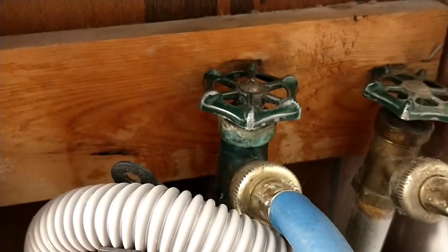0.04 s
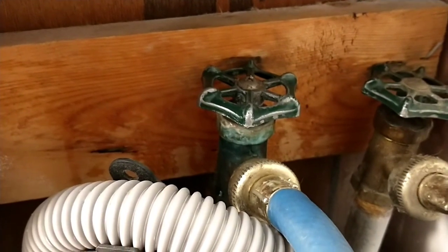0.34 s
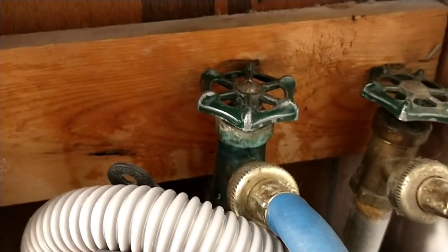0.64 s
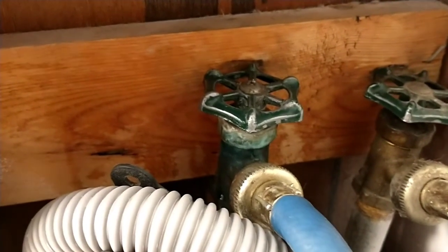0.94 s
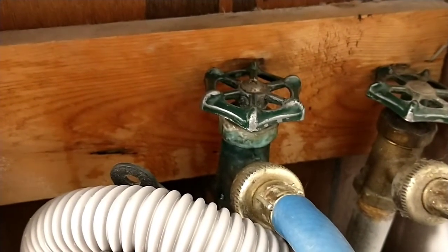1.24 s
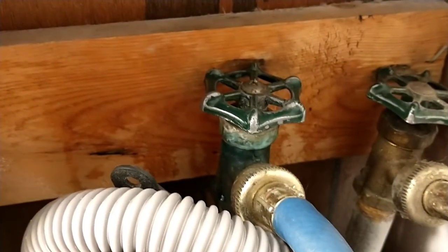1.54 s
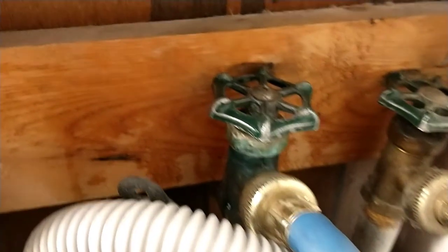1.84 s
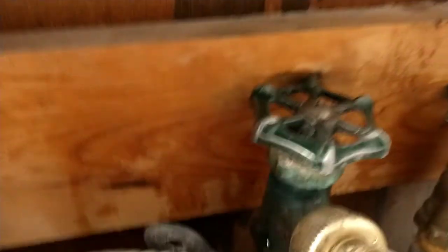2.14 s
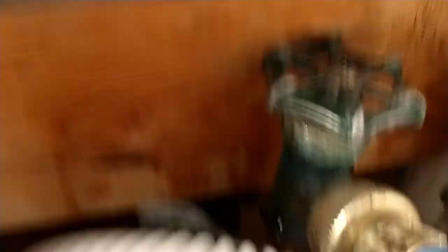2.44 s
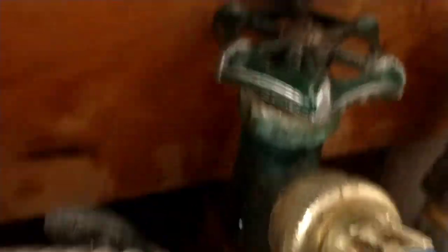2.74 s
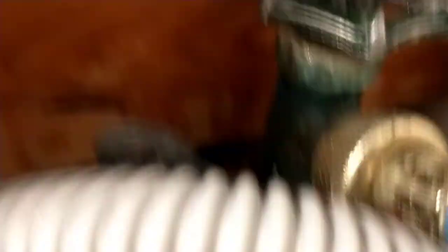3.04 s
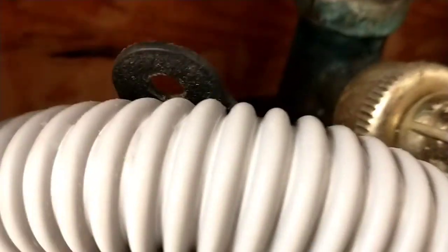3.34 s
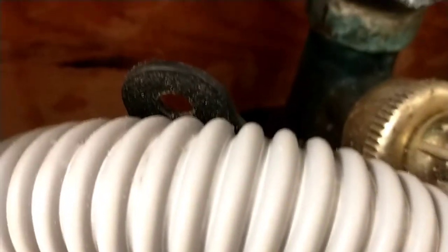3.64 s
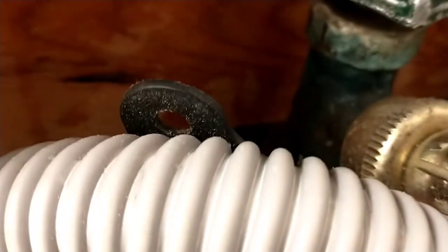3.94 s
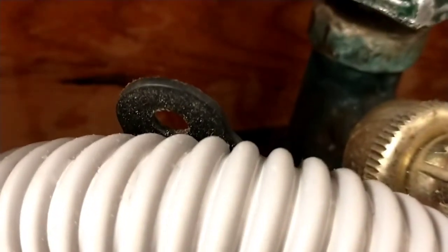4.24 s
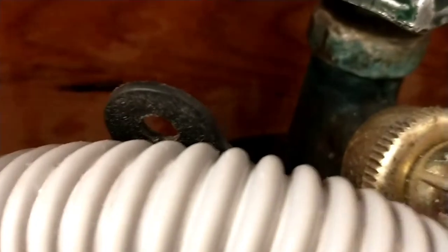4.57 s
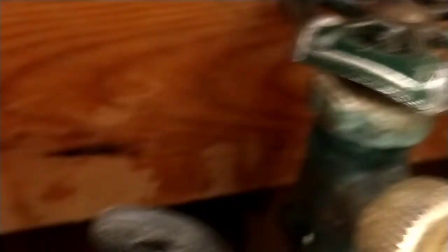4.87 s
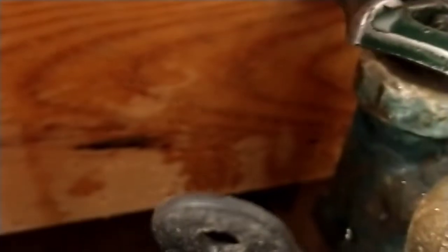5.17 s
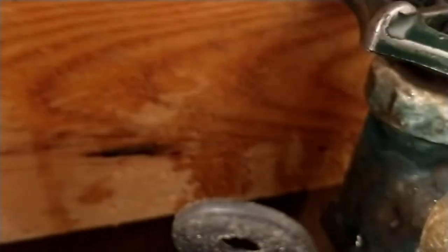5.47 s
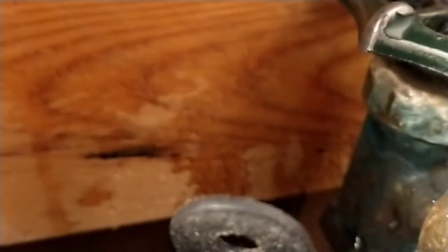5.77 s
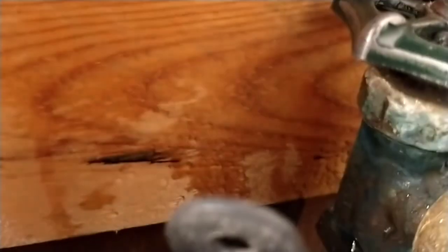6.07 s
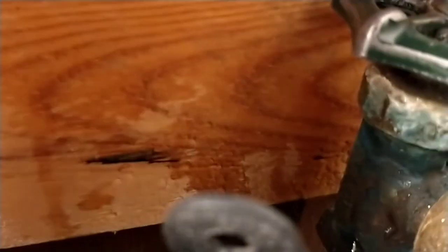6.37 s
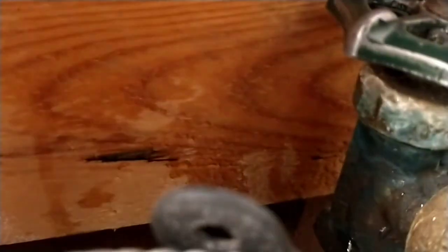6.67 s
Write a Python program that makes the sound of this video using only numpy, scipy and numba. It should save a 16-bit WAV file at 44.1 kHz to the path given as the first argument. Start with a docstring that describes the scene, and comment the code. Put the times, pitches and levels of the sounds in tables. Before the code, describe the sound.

A leaky valve coupling sputters indoors with a thin, high whistling hiss that keeps climbing, as fingers bump the microphone.

```python
"""A leaking hose coupling on a valve, against a wooden board in a quiet room; hand-held microphone.
First room tone, from afar. At 0.3 s water under pressure squeezes through the threads in tiny bursts:
the narrow gap's shrill ring keeps climbing, mostly after a drop as the seal slips; fine spray hisses.
From 2.1 to 3.3 s the microphone moves in close, and fingers bump and rub on its case.
From 4.75 to 6 s it rises above the coupling, where it stays while the leak spits on."""
import sys
import numpy as np
from scipy import signal
from scipy.fft import rfft, irfft, next_fast_len
from scipy.io import wavfile
from scipy.ndimage import uniform_filter1d
from numba import njit

SR = 44100
rng = np.random.default_rng(int(sys.argv[2]) if len(sys.argv) > 2 else 0)


def persist_wave(psi):
    """Save psi, clipped to +-1, as 16-bit WAV."""
    counts = np.round(np.clip(psi, -1, 1) * 32767).astype(np.int16)
    wavfile.write(sys.argv[1], SR, np.atleast_2d(counts).T)


N = 295911
TIME = np.arange(N) / SR


def from_db(db):
    """Decibels to gain."""
    return 10 ** (np.asarray(db) / 20)


def rms_one(x):
    """Scale to unit power."""
    return x / np.sqrt(np.mean(x ** 2) + 1e-20)


def in_time(rows):
    """Join (time [s], value) rows by straight lines."""
    s, value = np.transpose(rows)
    return np.interp(TIME, np.sort(s), value)


def cut(x, hz, kind, order=2):
    """Butterworth filter."""
    return signal.sosfilt(signal.butter(order, hz, kind, fs=SR, output="sos"), x)


def coloured(x, spectrum):
    """Give a signal a (frequency [Hz], level [dB]) spectrum that falls away beyond its ends."""
    hz, db = np.transpose(spectrum)
    size = next_fast_len(N, True)
    f = np.maximum(np.fft.rfftfreq(size, 1 / SR), 1)
    gain = from_db(np.interp(np.log(f), np.log(hz), db))
    ends = np.minimum(1, np.minimum(f / hz[0], hz[-1] / f)) ** 2
    return irfft(rfft(x, size) * gain * ends, size)[:N]


def drift(rate_hz):
    """Smooth random wander with spread 1, mostly slower than rate_hz."""
    return rms_one(cut(rng.standard_normal(N + SR), rate_hz, "low")[SR:])


def evened(x, window_s):
    """Hold the power steady over the window, leaving the faster grain."""
    size = int(window_s * SR / 2)
    power = uniform_filter1d(uniform_filter1d(x ** 2, size), size)
    return x / np.sqrt(np.maximum(power, 1e-12))


def swell(age, half_s):
    """A bell-shaped rise and fall around age 0."""
    return np.exp(-np.minimum((age / half_s) ** 2, 30))


def bursts(rows, attack_s):
    """Envelope of (time [s], strength [dB], decay [s]) events that rise and die away; powers add."""
    power = np.zeros(N)
    for s, db, decay_s in rows:
        start = int(s * SR)
        age = TIME[:N - start][:SR]
        burst = from_db(db) * (1 - np.exp(-age / attack_s)) * np.exp(-age / decay_s)
        power[start:start + len(age)] += burst ** 2
    return np.sqrt(power)


@njit
def moving_resonance(x, hz, width_hz):
    """A two-pole band-pass with gain 1 on top, whose centre and width move."""
    y = np.zeros(len(x))
    for i in range(2, len(x)):
        r = np.exp(-np.pi * width_hz[i] / SR)
        feedback = 2 * r * np.cos(2 * np.pi * hz[i] / SR) * y[i - 1] - r * r * y[i - 2]
        y[i] = (1 - r * r) / 2 * (x[i] - x[i - 2]) + feedback
    return y


# the room at rest: (frequency [Hz], relative level [dB])
ROOM_SPECTRUM = [(18, -67), (30, -29), (85, -6.5), (118, 1.5), (144, -9), (265, -11), (498, -16),
                 (535, -14), (601, -16.5), (874, -16), (1080, -18), (4610, -25), (5180, -32), (8090, -27),
                 (10500, -75), (17800, -120)]
def room_tone(level_db=-68):
    """The faint, steady, low noise of a quiet room."""
    return from_db(level_db) * rms_one(coloured(rng.standard_normal(N), ROOM_SPECTRUM))


# where the microphone is held: (time [s], place [0 afar, 1 close up, 2 above])
MIC_PATH = [(0,0),(2.1,0),(3.3,1),(4.75,1),(5.1,1.7),(6.0,2),(6.7,2)]
def nearness(place):
    """How fully the microphone is at this place, 0-1."""
    return np.maximum(0, 1 - abs(in_time(MIC_PATH) - place))


# first echoes off board, valve and hose: (microphone place, delay [s], signed relative gain)
EARLY_ECHOES = [(0,.000645,.17),(0,.00101,.1),(0,.00137,-.09),(0,.001705,.13),(1,.000565,.14),(1,.000855,-.15),(1,.001185,.19),(1,.001715,.16),(2,.000605,.22),(2,.00095,-.15),(2,.001365,-.25),(2,.00173,.16)]
def surroundings(x, echo_strength=0.66, t60_s=0.032, tail_db=-10.5):
    """Quick echoes comb the sound as the microphone moves; the small room adds a short tail."""
    out = x.copy()
    for place, delay_s, gain in EARLY_ECHOES:
        delayed = np.interp(TIME - delay_s, TIME, x)
        out += echo_strength * gain * nearness(place) * delayed
    age = TIME[:SR // 3]
    tail = rng.standard_normal(len(age)) * from_db(-60 * age / t60_s) * (age > .002)
    return out + from_db(tail_db) * signal.fftconvolve(x, tail / np.linalg.norm(tail))[:N]


# the case is jolted on the way in: (time [s], strength [dB], decay [s])
CASE_JOLTS = [(2.705,-53,.07),(2.955,-50,.12)]
def jolts(band_hz=(48, 125)):
    """The moving case shakes the microphone itself: very deep thumps."""
    rumble = rms_one(cut(rng.standard_normal(N), band_hz, "band"))
    return bursts(CASE_JOLTS, attack_s=0.0046) * rumble


# tones of the case, right at the microphone: (time [s], half length [s], pitch [Hz], level [dB])
CASE_TONES = [(2.735,0.019,149.2,-42.5),(2.783,0.019,150,-40),(2.826,.013,1030,-47.5),(2.898,0.034,333,-44.5),(3.047,0.023,339,-43),(3.08,0.018,156.2,-30.5),(3.128,0.024,333.3,-30.5)]
def case_tones(waver=.03):
    """The handled case rings and groans in brief low tones, with one finger squeak near 1 kHz."""
    clock = np.cumsum(1 + waver * drift(64)) / SR
    return sum(from_db(db) * swell(TIME - s, half_s) * np.sin(2 * np.pi * hz * clock)
               for s, half_s, hz, db in CASE_TONES)


# the microphone's case when knocked and when rubbed: (frequency [Hz], relative level [dB])
THUD_SPECTRUM = [(30,-27),(60,-32),(90,-3),(120,-1),(157,5.5),(200,1.5),(245,-9.5),(280,-9),(330,-10.5),(400,-23),(500,-20),(700,-23)]
RUB_SPECTRUM = [(150,4.5),(270,7),(350,5.5),(420,4),(600,0.5),(1000,1.5),(1400,0),(2000,4.5),(3000,-1.5),(5000,-26)]
# firmness of the grip, as the rustle of the hand: (time [s], level [dB])
GRIP_RUSTLE = [(0,-95),(2.2,-73.5),(2.8,-60),(3.3,-59),(4.6,-68.5),(5.3,-62.5),(5.9,-73.5),(6.7,-62)]
# fingers knock on the case: (time [s], strength [dB], decay [s])
FINGER_BUMPS = [(.812,-55,0.013),(1.83,-61,0.021),(2.705,-41,0.02),(2.745,-47,.04),(2.86,-50,0.059),(2.955,-41,0.069),(3.025,-37.5,0.057),(3.06,-41,0.052),
                (3.11,-32.5,0.061),(3.5,-54.5,0.073),(3.81,-49,0.048),(3.875,-53,0.21),(4.05,-51,0.028),(4.18,-49,.03),(4.28,-50.5,0.046),(4.36,-47.5,0.032),
                (4.435,-47.5,0.037),(4.5,-48.5,0.084),(4.575,-46.5,0.057),(4.77,-47,0.049),(4.94,-52.5,0.052),(6.255,-58,0.034)]
# fingers slide over it: (middle time [s], half length [s], level [dB])
FINGER_RUBS = [(2.846,0.046,-45),(3.118,0.068,-43),(4.96,0.14,-53)]
def handling(bump_db=1.0, grip_thud_db=-4, lumpy_db=1.0):
    """Fingers shift on the case: dull lumpy bumps and a dry rub, over the rustle of the grip."""
    thud_noise = rng.standard_normal(N) * from_db(lumpy_db * drift(52))
    rub_noise = rng.standard_normal(N) * from_db(lumpy_db * drift(97))
    thud = evened(coloured(thud_noise, THUD_SPECTRUM), window_s=0.04)
    rub = rms_one(coloured(rub_noise, RUB_SPECTRUM))
    grip = from_db(in_time(GRIP_RUSTLE))
    knocks = from_db(bump_db) * bursts(FINGER_BUMPS, attack_s=0.0065)
    slides = sum(from_db(db) * swell(TIME - s, half_s) for s, half_s, db in FINGER_RUBS)
    return np.hypot(knocks, from_db(grip_thud_db) * grip) * thud + np.hypot(slides, grip) * rub


def sputter(grain_db=7.0, clump_db=5.5, grain_hz=430, clump_hz=100, ceiling=2.46):
    """Air and water take turns in the gap: millisecond bursts of limited size, gathered in clumps."""
    grains = ceiling * np.tanh(drift(grain_hz) / ceiling)
    clumps = np.tanh(drift(clump_hz))
    return from_db(grain_db * grains + clump_db * clumps) * rng.standard_normal(N)


# the mist from afar, close up and from above: (frequency [Hz], relative level [dB])
MIST_FAR = [(400,-24),(1000,-22.5),(1280,-18.5),(1500,-19),(1820,-8.5),(2250,-15),(2450,-14.5),(2680,-20.5),(3000,-7.5),(3700,-6),(4200,-2),(5200,5),(5800,-30),(6350,7.5),(7000,-40),(7650,2.5),(8300,-54)]
MIST_CLOSE = [(400,-26),(850,-47),(1260,-9),(1450,-16.5),(1750,-5.5),(2150,-35),(2450,-4.5),(2750,-7),(3400,-.5),(4050,-0.5),(4350,-10),(5200,1),(7650,-3),(8300,-16)]
MIST_ABOVE = [(400,-14.5),(1400,-13.5),(1750,-4.5),(2200,-18),(2500,-1),(2900,-2),(3500,5),(3750,-1),(4020,8),(4300,-7.5),(4900,10.5),(5400,9),(5900,-17),(7700,-50),(8300,-9)]
# the mist at the microphone: (time [s], relative level [dB])
MIST_LEVEL = [(0,-93),(.28,-80),(.36,-62.5),(.78,-53.5),(1.4,-57),(1.7,-51),(2.4,-54),(2.85,-50.5),(4.7,-51.5),(4.97,-45.5),(5.15,-50.5),(6.4,-58.5),(6.71,-58)]
def spray(gain_db=-2.5):
    """A mist of fine drops hisses, coloured by the hollow between board, valve and hose."""
    drops = rms_one(sputter(grain_db=5.0, clump_db=1.5))
    mist = np.zeros(N)
    for place, colour in enumerate([MIST_FAR, MIST_CLOSE, MIST_ABOVE]):
        hiss = coloured(drops, colour)
        hiss /= np.std(cut(hiss, [2400, 3700], "band", order=6))   # equal in this band at every place
        mist += nearness(place) * hiss
    return from_db(in_time(MIST_LEVEL) + gain_db) * mist


# upward glides of the ring, most starting with a drop in pitch and loudness: (time [s],
# start pitch [Hz], target pitch [Hz], time constant [s], dip of the jet [dB, negative for a rise])
PITCH_CLIMBS = [(0.27,5200,5350,.024,1),(0.368,4700,6400,0.07,0.5),(0.48,4800,8100,0.26,13.5),(0.66,4240,5620,0.044,9),(0.748,4300,6500,0.024,10),(0.8,4780,7630,.2,9),
                (1.015,4970,5090,0.024,11.5),(1.105,4210,6100,0.038,0.5),(1.188,4000,5040,0.023,8.5),(1.268,3760,9300,0.16,6.5),(1.472,4360,7780,0.17,2.5),(1.635,4480,6730,0.047,1),
                (1.692,4800,5700,0.048,4.5),(1.76,4560,6360,0.041,0.5),(2.022,3710,6120,0.048,6),(2.175,2880,4730,0.014,6),(2.245,4780,7000,.095,-4.5),(2.42,2870,6330,0.029,11),
                (2.668,3130,6340,0.027,12),(3.075,4670,6550,0.052,7.5),(3.16,5870,7340,0.2,.5),(3.42,4030,6860,0.041,13),(3.62,3570,7070,0.049,14.5),(3.785,5600,6950,0.022,2),(4.19,3500,8900,0.083,11.5),
                (4.26,4320,8150,0.049,2),(4.345,3300,7450,0.043,6.5),(4.475,3350,7100,0.028,14),(4.595,3150,6790,0.032,7),(4.762,4340,6790,0.029,2),(4.868,4370,8370,0.068,3),
                (4.945,3900,8060,0.048,6.5),(5.035,2880,6530,0.018,3.5),(5.105,4280,6720,0.019,1.5),(5.487,3930,6830,0.026,1.5),(5.715,5450,6970,0.022,2.5),(5.865,4300,6870,0.032,6),
                (6.27,5600,6930,0.024,9.5),(6.585,4100,7020,0.021,9)]
def gap_pitch():
    """The open gap rings low; as the seal creeps shut the ring climbs."""
    hz = np.full(N, float(PITCH_CLIMBS[0][2]))
    for s, low_hz, high_hz, climb_s, _ in PITCH_CLIMBS:
        after = TIME >= s
        hz[after] = high_hz + (low_hz - high_hz) * np.exp((s - TIME[after]) / climb_s)
    return uniform_filter1d(hz, size=400)


def sag(lead_s=0.0048, fall_s=0.0049, recover_s=0.036):
    """Decibels that the jet loses: pressure sags just before most climbs, then rebuilds."""
    lost_db = np.zeros(N)
    for s, *_, dip_db in PITCH_CLIMBS:
        age = TIME - s + lead_s
        lost_db += dip_db * swell(age, np.where(age < 0, fall_s, recover_s))
    return lost_db


def gap_ring(flow, hz, sharpness=12.0, skirt=2.1):
    """Turbulence rings the gap; a second, wider pass steepens the flanks."""
    width_hz = hz / sharpness
    return moving_resonance(moving_resonance(flow, hz, width_hz), hz, width_hz * skirt)


# the sharpest spits from the coupling: (time [s], strength [dB], decay [s])
AIR_SPITS = [(0.363,-23,0.0023),(0.734,-14.5,0.0026),(0.765,-26,0.017),(1.097,-12,0.0027),(1.511,-21,0.012),(1.677,-9,0.0027),(2.045,-25,0.038),(2.117,-18.5,.015),
             (2.249,-30,0.0034),(2.441,-21,0.02),(2.563,-12.5,0.0045),(2.641,-9,0.0018),(3.09,-15,0.0032),(3.328,-20,.008),(3.669,-26,.008),(3.935,-13,0.0028),(3.969,-20,0.0067),
             (4.133,-12,0.0013),(4.453,-14.5,0.0029),(4.556,-17.5,0.0035),(4.849,-15,0.0023),(4.968,-13.5,.0021),(5.056,-16,0.0041),(5.565,-23,0.0023),(5.593,-10,0.0019),
             (5.945,-22.5,0.01),(5.992,-25.5,0.0067),(6.197,-25.5,0.0098),(6.324,-23,.006),(6.375,-19.5,0.0043),(6.626,-27.5,0.015)]
def spits(hz):
    """A larger pocket of air bursts through: a sharp puff at the gap's pitch."""
    ring = evened(gap_ring(rng.standard_normal(N), hz), window_s=.003)
    return bursts(AIR_SPITS, attack_s=0.0015) * ring


def choke(depth_db=3, lead_s=0.0063, half_s=.007):
    """Decibels that the jet loses while a pocket of air plugs the gap, just before each spit."""
    return depth_db * sum(swell(TIME - s + lead_s, half_s) for s, *_ in AIR_SPITS)


# the foam's broad resonances: (multiple of the gap's pitch, relative level [dB])
FOAM_RESONANCES = [(0.896,1.5),(.99,-6.5),(1.09,-1),(1.202,-5.5)]
def foam(hz):
    """Bubbles burst independently in each of the foam's resonances, which glide with the gap."""
    return rms_one(sum(from_db(db) * gap_ring(sputter(), hz * multiple, sharpness=10.5)
                       for multiple, db in FOAM_RESONANCES))


def strand(hz, wobble=0.018, wobble_hz=70, tight_sharpness=15, tight_hz=6500):
    """One thread of the leak, with its own bursts and wavering pitch."""
    waver = 1 + wobble * drift(wobble_hz)
    sharpness = tight_sharpness * (hz / tight_hz) ** .4   # a wider gap rings less sharply
    return rms_one(gap_ring(sputter(), hz * waver, sharpness))


# pressure behind the gap, heard as the jet's loudness: (time [s], relative level [dB])
JET_PRESSURE = [(0.25, -82), (0.39, -38), (0.82, -27.5), (0.9, -23), (1.07, -27), (1.39, -33.5),
                (1.69, -30.5), (1.85, -20), (2.07, -31.5), (2.64, -26), (3.3, -31.5), (4.02, -28.5),
                (4.39, -33.5), (5.29, -30.5), (5.43, -37), (5.66, -28), (5.73, -34.5), (6.71, -37.4)]
# foam in the jet at the reference pitch and pressure: (time [s], level against the ring [dB])
FOAM_SHARE = [(.3,-7.5),(1.9,-5.5),(2.6,-13.5),(2.95,-2.5),(3.9,-16),(5.6,-16.5),(6.7,-15)]
def jet(hz, gain_db=-0.5, pulse_db=3.0, pulse_hz=250, surge_db=2.28, surge_hz=25,
        reference_hz=6520, reference_db=-36):
    """Three strands ring the gap and foam behind it; the flow follows the pressure and surges at random."""
    pressure_db = in_time(JET_PRESSURE) - sag()
    ring = rms_one(strand(hz) + strand(hz) + strand(hz))
    tightness_db = 19 * np.log2(hz / reference_hz)   # the tighter the gap, the more it foams
    push_db = .8 * (pressure_db - reference_db)   # and the harder it is pressed
    froth = from_db(in_time(FOAM_SHARE) + tightness_db + push_db) * foam(hz)
    pulsing = (ring + froth) * from_db(pulse_db * drift(pulse_hz))
    level_db = pressure_db - choke() + gain_db + surge_db * drift(surge_hz)
    return from_db(level_db) * evened(pulsing, window_s=.03)


def scene():
    """Leak and mist in their corner, the hand on the microphone and the quiet room, in mono."""
    hz = gap_pitch()
    leak = jet(hz) + spits(hz) + spray()
    room = room_tone()
    return (surroundings(leak) + handling() + case_tones() + jolts() + room)[None]


def record(dry, band_edge_hz=7874, first_image_db=-37, second_image_db=-47, cutoff_hz=15800):
    """A narrow-band recorder: the top is cut, and faint images of the hiss fold up 4 and 8 kHz higher."""
    fade_out = np.minimum(1, (TIME[-1] - TIME) / .003)
    narrow = cut(dry, band_edge_hz, "low", order=24) * fade_out
    phase = 2 * np.pi * 4000 * TIME
    carriers = from_db(first_image_db) * np.cos(phase) + from_db(second_image_db) * np.cos(2 * phase)
    images = cut(2 * narrow * carriers, 9250, "high", order=6)
    return cut(narrow + images, cutoff_hz, "low", order=24)


dry = scene()
out = record(dry)
persist_wave(out)
```